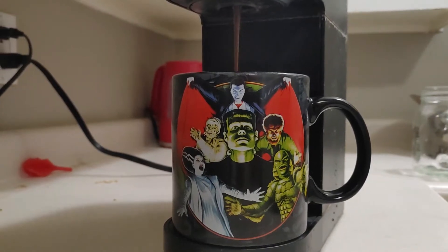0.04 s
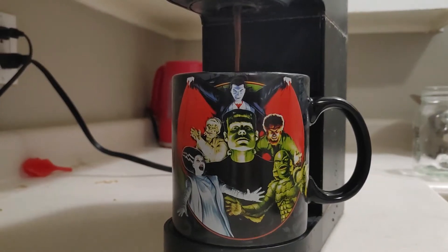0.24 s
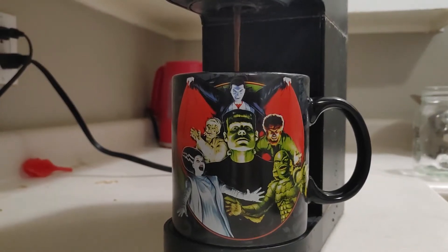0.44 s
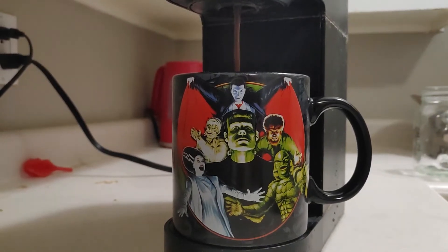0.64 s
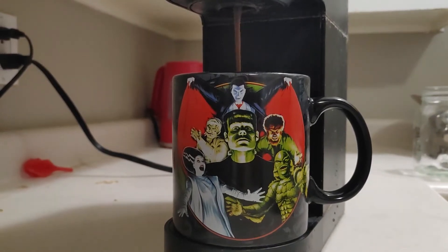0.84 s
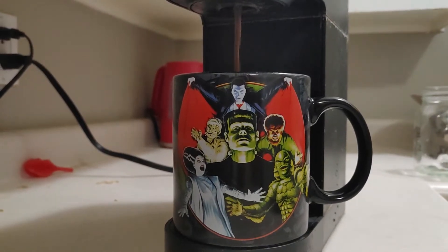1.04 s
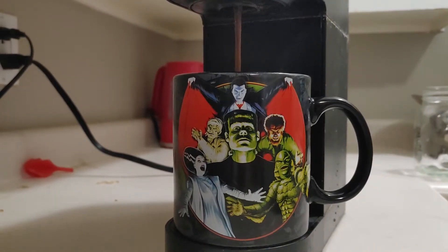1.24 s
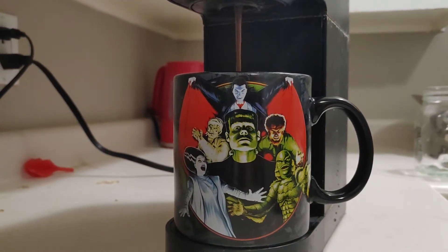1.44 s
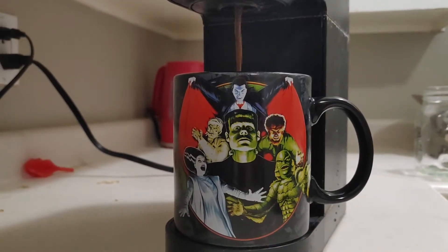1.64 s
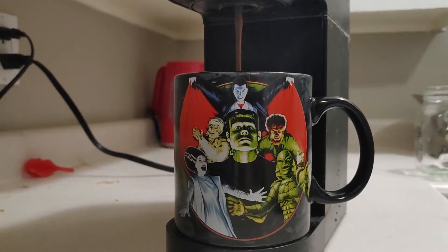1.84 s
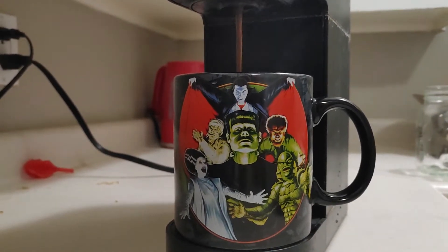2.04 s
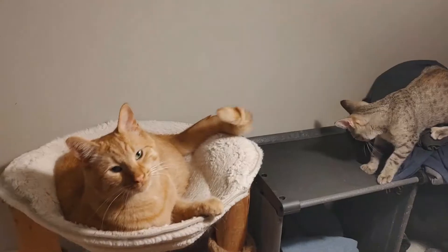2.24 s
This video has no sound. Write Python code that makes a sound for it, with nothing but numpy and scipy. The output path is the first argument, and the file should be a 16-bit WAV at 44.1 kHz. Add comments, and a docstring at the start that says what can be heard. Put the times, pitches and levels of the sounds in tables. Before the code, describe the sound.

A stream of coffee fizzes and bubbles into a mug, close by on a kitchen counter, over the machine's steady hum. One deep plop comes past the middle, and a soft finger tap near the microphone at the end.

```python
"""A small coffee machine on a kitchen counter pours a thin stream into a ceramic mug.
Its pump hums and rattles the housing. The stream fizzes and bubbles in the mug's resonances,
with low gurgles, louder splashes and one deep plop, over faint room rumble.
Two microphone ports are close by; a finger taps near the right one just before the sound stops."""
import sys
import numpy as np
from scipy import signal
from scipy.fft import rfft, irfft, next_fast_len
from scipy.io import wavfile
from scipy.ndimage import uniform_filter1d, map_coordinates

SR = 44100
rng = np.random.default_rng(int(sys.argv[2]) if len(sys.argv) > 2 else 0)


def dump(signal):
    """Clip the signal to [-1, 1] and save it as 16-bit WAV at the path in sys.argv[1]."""
    limited = np.clip(np.atleast_2d(signal).T, -1, 1)
    pcm = np.round(limited * 32767).astype(np.int16)
    wavfile.write(sys.argv[1], SR, pcm)


N = 101253
T = np.arange(N) / SR


def amp(db):
    return 10 ** (np.asarray(db) / 20)


def unit_rms(x):
    return x / np.sqrt(np.mean(x ** 2) + 1e-20)


def curve(rows):
    return np.interp(T, *np.transpose(rows))


def log_interp(rows, hz):
    knot_hz, values = np.transpose(rows)
    return np.interp(np.log(hz + 1), np.log(knot_hz + 1), values)


def wobble(knots_per_s):
    """Smooth random curve."""
    return map_coordinates(rng.standard_normal(int(N * knots_per_s / SR) + 4), [T * knots_per_s])


def filtered(x, response):
    size = next_fast_len(N + SR // 2)
    return irfft(rfft(x, size) * response(np.fft.rfftfreq(size, 1 / SR)), size)[..., :N]


def resonate(x, modes):
    """Steep resonances of alternating sign, each with its own gain per port."""
    def response(hz):
        total = 0
        for k, (centre_hz, width_hz, left_db, right_db) in enumerate(modes):
            damping = 1j * hz * width_hz
            peak = (1.513 * damping / (centre_hz ** 2 - hz ** 2 + 1.47 * damping)) ** 2
            total += (-1) ** k * amp([[left_db], [right_db]]) * peak
        return total
    return filtered(x, response)


def patchy_noise(depth_db):
    """Two independent noises under shared time-frequency patches of random gain."""
    spectra = signal.stft(rng.standard_normal((2, N)), nperseg=512)[2]
    patches = uniform_filter1d(rng.standard_normal(spectra.shape[1:]), 6, axis=0)
    patches = unit_rms(uniform_filter1d(patches, 8, axis=1))
    return unit_rms(signal.istft(spectra * amp(depth_db * patches), nperseg=512)[1][:, :N])


# Kitchen decay: freq_hz, t60_s
KITCHEN_DECAY = [(500, 0.18), (4000, 0.3), (12000, 0.13)]


def kitchen(x, wet_db):
    """Direct sound plus short reflections from counter and cupboards, different at each port."""
    hz, t, spectra = signal.stft(rng.standard_normal((2, SR // 3)), SR, nperseg=256)
    decay = amp(-60 * t / log_interp(KITCHEN_DECAY, hz)[:, None])
    tail = signal.istft(spectra * decay, SR, nperseg=256)[1]
    return x + amp(wet_db) * signal.fftconvolve(x, tail / np.linalg.norm(tail[0]), axes=1)[:, :N]


# Pump speed: time_s, strokes_per_s
STROKE_RATE = [(0, 53.7), (.5, 53.65), (1.1, 53.63), (1.3, 53.88), (1.7, 53.85), (2.1, 53.7)]
# Hum lines: stroke_multiple, left_db, right_db, left_lead_rad
HUM_LINES = [(3, -77, -81.5, -2), (4, -61, -68, -1), (5, -71.5, -78.5, 0.5), (6, -75, -78, 2),
             (7, -82, -79.5, -8.5), (8, -71.5, -80, -1.2), (9, -51, -52, -0.02), (10, -53.5, -69.5, 2),
             (11, -64.5, -67.5, 2.5), (12, -57, -66, -2.5), (13, -59.5, -67.5, -1.5),
             (14, -72, -85.5, -1.0), (15, -71.5, -76.5, 1.5), (16, -66, -73, 0.2), (17, -60.5, -56, -2.5),
             (18, -64.5, -67, 2.43), (19, -68.5, -69.5, 4), (20, -70, -84.5, -3)]
# Swells and dips of the strongest line: time_s, relative_db
HUM_SWELL = [(0.0, -52.5), (0.09, -51), (0.4, -56.5), (0.43, -74), (0.46, -55.5), (0.52, -52), (1.16, -53),
             (1.24, -68), (1.29, -54.5), (1.48, -53.5), (1.83, -58), (1.86, -55), (2.1, -50), (2.14, -52.5)]


def pump(strongest_multiple=9, waver_db=1.2, waver_rad=0.37):
    """The pump hums at slightly unsteady multiples of its stroke rate and shakes the housing."""
    stroke_rad = 2 * np.pi * np.cumsum(curve(STROKE_RATE)) / SR
    swell_db = curve(HUM_SWELL)
    swell_db -= np.median(swell_db)
    hum = np.zeros((2, N))
    for multiple, left_db, right_db, lead_rad in HUM_LINES:
        phase = multiple * stroke_rad + rng.uniform(0, 2 * np.pi) + waver_rad * wobble(11.73)
        swing_db = swell_db if multiple == strongest_multiple else waver_db * wobble(5.84)
        gain = np.sqrt(2) * amp(swing_db + [[left_db], [right_db]])
        hum += gain * np.sin(phase + [[lead_rad], [0]])
    return hum + housing_rattle(stroke_rad)


# Housing resonances: centre_hz, width_hz, left_db, right_db
HOUSING_MODES = [(211, 130, -17, -23), (502, 72.6, -3.5, -11), (656, 136, -5.5, -18.5),
                 (911, 116, -6.5, -10), (1360, 197, -11, -16.5), (1685, 168, -10.5, -13),
                 (2098, 170, -24, -16)]
# Rattle envelope: time_s, relative_db
RATTLE_LEVEL = [(0, -54), (.4, -53), (.5, -53.5), (.56, -51.5), (.64, -55), (1.2, -54), (1.6, -54),
                (1.8, -55), (2.0, -54.5), (2.06, -53.5), (2.12, -52.5)]


def housing_rattle(stroke_rad, stroke_depth=0.21, loose_db=-4, gain_db=3):
    """Noise pulsing with the strokes, plus a looser unpulsed noise, rings in the housing."""
    shake = patchy_noise(depth_db=2.5)[:1] * (1 + stroke_depth * np.sin(stroke_rad))
    drive = kitchen(shake * [[1], [1]], wet_db=5.5) + amp(loose_db) * patchy_noise(depth_db=3.5)
    return amp(curve(RATTLE_LEVEL) + gain_db) * unit_rms(resonate(drive, HOUSING_MODES))


def bubbles(start_s, pitch_hz, gain, cycles, samples, onset_power=0.5, rise=0.035):
    """Each bubble rings as a damped sine that rises in pitch."""
    t = np.arange(samples) / SR
    age = t * pitch_hz[:, None] / cycles
    envelope = gain[:, None] * age ** onset_power * np.exp(-3 * age)
    phase = 2 * np.pi * pitch_hz[:, None] * t * (1 + rise * np.minimum(age, 2) / 2)
    index = (start_s * SR).astype(int)[:, None] + np.arange(samples)
    return np.bincount(index.ravel(), (envelope * np.sin(phase)).ravel(), N + SR)[:N]


# Mug resonances: centre_hz, width_hz, left_db, right_db
MUG_MODES = [(2557, 300, -4, -4), (3280, 353, -4, -6.5), (3815, 280, -2.5, -9.5), (4207, 330, -4.5, -0.5),
             (4800, 330, -1, -9.5), (5350, 415, -3, -1), (6627, 730, -2, -4), (7400, 390, -1, 0),
             (7960, 490, -7.5, 0.5), (8715, 580, -18, -13.5), (10680, 1240, -12.5, -10),
             (11700, 540, -9, -5.5), (14400, 2100, -26.5, -35.5), (7310, 53, 0.5, 2.5),
             (12290, 460, -18.5, -14.5)]
# Stream envelope: time_s, relative_db
STREAM_LEVEL = [(0.0, -51.5), (0.516, -50.5), (0.688, -51.5), (1.27, -50), (1.45, -52), (1.95, -51.5)]


def stream(bubbles_per_s=900, centre_hz=6502, log_spread=0.4507, fizz_db=4, gain_db=2.5):
    """Dense small bubbles and fizz ring in the mug."""
    count = int(bubbles_per_s * N / SR)
    pitch_hz = np.clip(centre_hz * np.exp(log_spread * rng.standard_normal(count)), 2400, 15000)
    start_s = rng.uniform(0, N / SR, count)
    size_db = 2.8 * np.minimum(rng.exponential(size=count), 3.5)
    pops = unit_rms(bubbles(start_s, pitch_hz, amp(size_db), cycles=14.3, samples=400))
    wet_pops = unit_rms(kitchen(pops * [[1], [1]], wet_db=5))
    drive = wet_pops + amp(fizz_db) * patchy_noise(depth_db=2.2)
    level_db = curve(STREAM_LEVEL) + wobble(14.05) + gain_db
    return amp(level_db) * unit_rms(resonate(drive, MUG_MODES))


# Gurgle envelope: time_s, relative_db
GURGLE_LEVEL = [(0, -60), (.05, -67), (.15, -55), (.25, -65), (.42, -61.5), (.47, -63), (.57, -51),
                (.7, -53), (.8, -64), (.9, -54.5), (1.05, -63), (1.2, -59), (1.5, -67), (1.67, -64),
                (1.84, -55), (1.96, -61), (2.04, -53.5), (2.12, -64)]


def gurgle(bubbles_per_s=110, centre_hz=662, log_spread=0.07, right_db=-12, gain_db=3):
    """Larger, lower bubbles swell in the air of the mug, louder at the left port."""
    count = int(bubbles_per_s * N / SR)
    pitch_hz = centre_hz * np.exp(log_spread * rng.standard_normal(count))
    start_s = rng.uniform(0, N / SR, count)
    size_db = 4.5 * rng.standard_normal(count)
    pops = unit_rms(bubbles(start_s, pitch_hz, amp(size_db), cycles=15, samples=2000))
    return amp(curve(GURGLE_LEVEL) + gain_db) * kitchen(amp([[0], [right_db]]) * pops, wet_db=-8.5)


# Rumble spectrum: freq_hz, relative_db
RUMBLE_SPECTRUM = [(15, -62), (25, -21), (113, -16), (211, -8), (356, -16.5), (400, -23.5), (520, -46),
                   (880, -120)]


def room_rumble(level_db=-69.5):
    """Steady low room noise, partly in antiphase between the ports."""
    noise = rng.standard_normal((3, N))
    stereo = noise[:2] + 1.1 * noise[2] * [[1], [-1]]
    return amp(level_db) * unit_rms(filtered(stereo, lambda hz: amp(log_interp(RUMBLE_SPECTRUM, hz))))


# Splashes into the mug: time_s, bubble_db, pitch_hz, log_spread, spatter_db
SPLASH_EVENTS = [(.169, -39, 4800, 0.14, -44), (0.189, -28.5, 11700, 0.048, -34.5),
                 (0.269, -44, 7400, .015, -38), (.268, -32.5, 4280, 0.058, -47),
                 (.29, -36, 11700, .04, -41), (0.295, -31.5, 7400, .015, -33.5),
                 (0.319, -34, 7530, 0.025, -35), (0.414, -30, 7950, 0.085, -21.5),
                 (.447, -20.5, 11700, 0.034, -30.5), (0.5716, -23.5, 5350, 0.05, -29.5),
                 (.5755, -21.5, 5370, .02, -50), (.633, -27, 7400, 0.021, -40),
                 (.633, -35, 3520, 0.01, -53), (0.6538, -27.5, 7040, 0.028, -37),
                 (0.695, -30, 2390, 0.036, -53), (.718, -43, 2460, 0.024, -55),
                 (0.77, -35, 7750, 0.041, -27.5), (.823, -33, 11500, .03, -45), (.89, -33, 11100, .05, -37),
                 (.917, -33, 10900, .05, -34), (.957, -37, 11000, .05, -39), (0.929, -29, 7280, 0.012, -35),
                 (.929, -31.5, 3430, 0.01, -51), (1.1086, -34.5, 7400, 0.012, -57),
                 (1.1394, -32.5, 7300, 0.017, -43), (1.196, -37, 7300, .01, -43.5),
                 (1.2356, -30, 7470, .015, -36), (1.259, -30.5, 7550, 0.0072, -37.5),
                 (1.299, -36, 7400, .015, -39.5), (1.328, -31.5, 11700, .02, -48.5),
                 (1.371, -29, 11700, .04, -42.5), (1.427, -30.5, 7190, 0.022, -36),
                 (1.6162, -27.5, 5180, 0.084, -43), (1.64, -32, 5330, 0.046, -40.5),
                 (1.6896, -27.5, 11300, 0.06, -33), (1.739, -35, 7320, 0.035, -34),
                 (1.911, -39.5, 4100, 0.12, -39), (2.046, -17, 7420, 0.068, -36.5),
                 (2.0634, -31.5, 8000, 0.023, -47.5), (2.08, -30.5, 7460, 0.045, -44),
                 (2.079, -35, 11500, 0.044, -46.5), (2.14, -28, 6680, 0.081, -26.5),
                 (2.14, -31, 10800, 0.036, -46)]


def splashes(count=8, cluster_s=0.0095, fade_db=8, spatter_rise_s=0.0019, spatter_decay_s=0.0075):
    """Each splash is a quick, fading bubble cluster with bright spatter, ringing in the mug."""
    time_s, bubble_db, pitch_hz, log_spread, spatter_db = np.transpose(SPLASH_EVENTS)[:, :, None]
    shape = (2, len(time_s), count)  # port, splash, bubble
    progress = (np.arange(count) + rng.uniform(size=shape)) / count
    bubble_hz = pitch_hz * np.exp(np.abs(log_spread) * rng.standard_normal(shape))
    start_s = time_s - 0.0038 + cluster_s * progress ** 1.4
    gains = amp(bubble_db - fade_db * progress ** 2)
    rings = [bubbles(s.ravel(), hz.ravel(), gain.ravel(), cycles=22, samples=1200, onset_power=0.29)
             for s, hz, gain in zip(start_s, bubble_hz, gains)]
    t = np.maximum(T - time_s + 0.004, 0)
    bursts = amp(spatter_db) * (1 - np.exp(-t / spatter_rise_s)) * np.exp(-t / spatter_decay_s)
    spatter = bursts.sum(axis=0) * np.diff(rng.standard_normal((2, N + 2)), 2)
    return kitchen(resonate(rings + spatter, MUG_MODES), wet_db=-7)


# Tones of the large bubble: pitch_hz, relative_db, t60_s
PLOP_TONES = [(617, -16.5, 0.05), (696, 2, 0.035), (984, 1.5, 0.055), (1098, -5, 0.018)]


def plop(start_s=1.3535, gain_db=-32.5, rise_s=0.0014, hold_s=0.0078, right_lead_rad=1.6):
    """One large bubble: a few low tones hold briefly, then die."""
    t = np.maximum(T - start_s, 0)
    fall_s = np.maximum(t - hold_s, 0)
    tones = sum(amp(db - 60 * fall_s / t60_s) * np.sin(2 * np.pi * hz * t + [[0], [right_lead_rad]])
                for hz, db, t60_s in PLOP_TONES)
    port_gain = amp(gain_db + np.array([[1.5], [-1.5]]))
    return kitchen(port_gain * tones * (1 - np.exp(-t / rise_s)), wet_db=-9.5)


def finger_tap(time_s=2.0962, gain_db=-18, left_db=-23, pitch_hz=325, decay_s=0.00075, lead_s=0.0028):
    """A fingertip's soft touch, then a dull push with a sharp front, mostly at the right port."""
    t = np.maximum(T - time_s, 0)
    push = np.exp(-t / decay_s) * np.cos(2 * np.pi * pitch_hz * t) * (1 - np.exp(-t / 0.00004))
    touch = amp(-13) * np.exp(-((T - time_s + lead_s) / 0.00036) ** 2)

    def bandpass(hz):
        return (1j * hz / (100 + 1j * hz)) ** 2 / (1 + 1j * hz / 7000) ** 2
    return amp(gain_db + np.array([[left_db], [0]])) * filtered(push - touch, bandpass)


def scene():
    rumble = room_rumble()
    return pump() + stream() + gurgle() + rumble + splashes() + plop() + finger_tap()


def record(dry, end_s=2.1535, fade_s=0.002, cutoff_hz=15700):
    """Abrupt stop and steep low-pass."""
    gate = np.clip((end_s - T) / fade_s, 0, 1)
    return filtered(dry * gate, lambda hz: 1 / (1 + (hz / cutoff_hz) ** 80))


dry = scene()
out = record(dry)
dump(out)
```